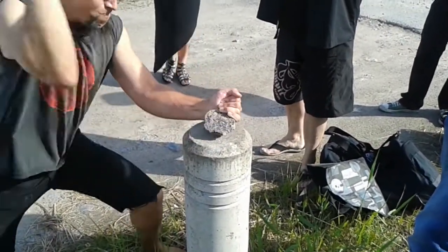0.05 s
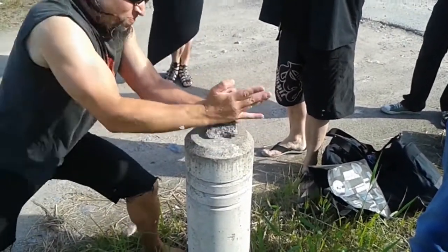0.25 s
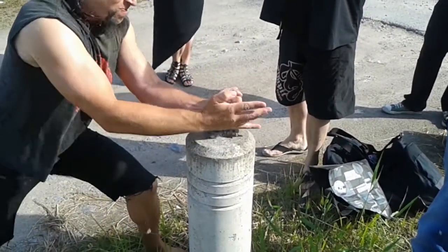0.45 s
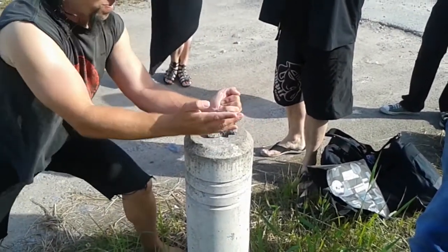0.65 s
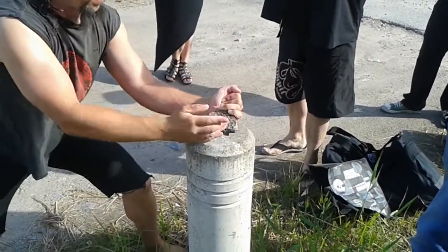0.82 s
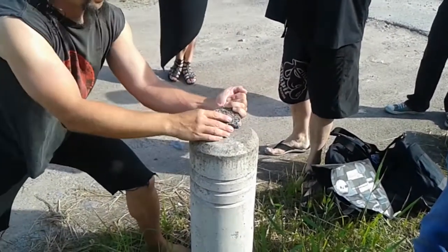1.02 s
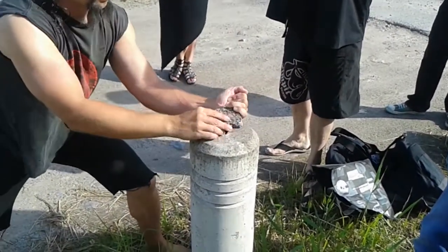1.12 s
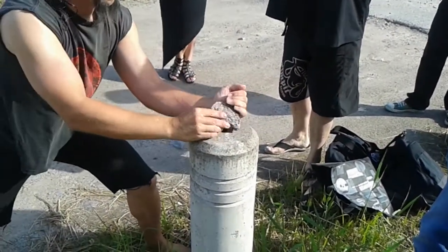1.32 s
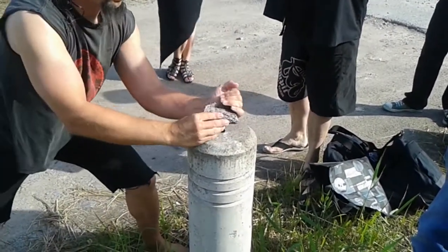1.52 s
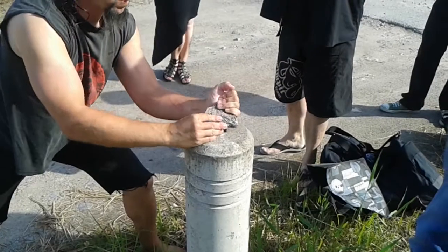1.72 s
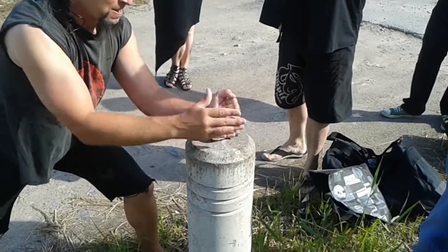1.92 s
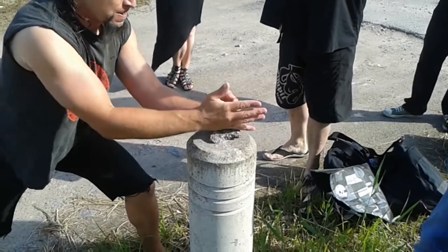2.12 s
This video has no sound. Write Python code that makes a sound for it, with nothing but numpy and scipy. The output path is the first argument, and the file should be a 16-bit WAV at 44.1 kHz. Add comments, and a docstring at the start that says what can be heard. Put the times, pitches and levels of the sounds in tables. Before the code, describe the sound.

Struck by hand on a concrete post outdoors, a stone breaks with a sharp crack. A fragment then clacks onto gritty ground and bounces briefly, with faint wind on the microphone and a low hum behind.

```python
"""Stone snapped on a post

A hand strikes a stone on a concrete post outdoors: the stone taps the post and snaps with one dry crack.
A broken piece lands with a ringing clack and tumbles to rest.
Light wind hisses and nudges the microphone over a low hum, like that of a distant engine."""
import sys
import numpy as np
from scipy import signal
from scipy.fft import rfft, irfft
from scipy.io import wavfile
from scipy.ndimage import uniform_filter1d

SR = 44100
rng = np.random.default_rng(int(sys.argv[2]) if len(sys.argv) > 2 else 0)


def int16_out(signal):
    """Quantize to a 16-bit WAV file."""
    q = np.round(np.clip(np.atleast_2d(signal).T, -1, 1) * 32767)
    wavfile.write(sys.argv[1], SR, q.astype(np.int16))


N = 94815


def amp(db):
    """Decibels to gain."""
    return 10 ** (np.asarray(db) / 20)


def unit_rms(x):
    """Scales to an rms of 1."""
    return x / np.sqrt(np.mean(x ** 2) + 1e-20)


def curve_at(points, hz):
    """Interpolates a table on a log-frequency axis."""
    point_hz, value = np.transpose(points)
    return np.interp(np.log(hz + 1), np.log(point_hz + 1), value)


def add(mix, start_s, sound):
    """Mixes a sound in at a start time."""
    part = mix[round(start_s * SR):][:len(sound)]
    part += sound[:len(part)]


def colour(x, spectrum, size=4096):
    """Minimum-phase filter with the given spectrum."""
    hz = abs(np.fft.fftfreq(size, 1 / SR))
    log_gain = np.log(amp(curve_at(spectrum, hz)))
    taps = np.fft.ifft(np.exp(np.conj(signal.hilbert(log_gain)))).real
    return signal.fftconvolve(x, taps[:size // 2])[:len(x)]


def ring(force, modes):
    """Drives decaying modes; neighbours swing in opposite directions."""
    t = np.arange(SR // 2) / SR
    response = np.zeros(len(t))
    for k, (hz, db, t60_s) in enumerate(modes):
        decay = np.exp(-np.log(1000) * t / t60_s)
        response += (-1) ** k * amp(db) * decay * np.sin(2 * np.pi * hz * t)
    return signal.fftconvolve(force, response)[:len(force)]


def contact_force(contact_s, size=4096, passes=12):
    """Stone on stone: a dying burst of tiny breaks, flat in spectrum, of energy 1."""
    fade = np.exp(-np.arange(size) / SR / contact_s)
    force = rng.standard_normal(size) * fade
    for _ in range(passes):
        spectrum = rfft(force)
        whitened = irfft(spectrum / (abs(spectrum) + 1e-12))
        force = whitened * np.minimum(1, 10 * fade)
    return force / np.linalg.norm(force)


# Wind colour. Each row: frequency in Hz, relative spectral density in dB.
BREEZE_SPECTRUM = [(15, -10), (30, -1), (58, 1), (100, -3), (150, -6.5), (280, -12.5), (450, -19.5),
                   (1000, -22.5), (1700, -27), (4000, -31), (8000, -33), (14500, -33)]
# Wind swell. Each row: time in seconds, relative level in dB.
BREEZE_SWELL = [(0, 0), (.18, 4), (.3, 0.5), (.46, 0.5), (.6, 2), (.85, 0.6), (1.08, 0), (1.18, -2.5),
                (1.37, -2), (1.48, -7.5), (1.548, -2), (1.65, -5.5), (1.92, -4), (2.1, -1), (2.15, -2)]


def breeze(base_db=-59, flicker_db=0.84, lump_db=0.91, lump_hz=504.4):
    """Light wind: soft hiss over a lumpy rumble, swelling and sinking together."""
    frames = dict(fs=SR, nperseg=1024, noverlap=768)
    hz, _, bands = signal.stft(rng.standard_normal(N), **frames)
    patches = uniform_filter1d(rng.standard_normal(bands.shape), size=10, axis=0)
    patches = unit_rms(uniform_filter1d(patches, size=10, axis=1))
    depth_db = flicker_db + lump_db / (1 + (hz[:, None] / lump_hz) ** 2)
    noise = signal.istft(bands * amp(depth_db * patches), **frames)[1][:N]
    band_gain = amp(curve_at(BREEZE_SPECTRUM, np.fft.rfftfreq(N, 1 / SR)))
    wind = unit_rms(irfft(rfft(noise) * band_gain, N))
    swell_db = np.interp(np.arange(N) / SR, *np.transpose(BREEZE_SWELL))
    return wind * amp(base_db + swell_db)


# Course of the hum. Each row: time in seconds, pitch in Hz, level in dB.
HUM_TRACK = [(0, 80.43, -52.5), (.2, 80.9, -53), (.3, 80.07, -63), (.4, 80.9, -63), (0.551, 79.66, -56),
             (.7, 80.83, -58.5), (.82, 76.93, -54), (.95, 77.8, -61.5), (1.1, 77.7, -62), (1.3, 78.5, -68),
             (1.47, 77.5, -85), (1.75, 74.7, -78), (1.95, 72.27, -78), (2.1, 73.16, -58.5), (2.15, 73, -65)]
# Its partials. Each row: multiple of the pitch, relative level in dB.
HUM_PARTIALS = [(1, -1), (2, -14), (3, -21)]


def hum(waver_depth=0.34, waver_samples=2500):
    """A low wavering drone that sags in pitch and fades in and out."""
    t = np.arange(N) / SR
    times_s, pitch_hz, level_db = np.transpose(HUM_TRACK)
    phase = 2 * np.pi * np.cumsum(np.interp(t, times_s, pitch_hz)) / SR
    drone = np.zeros(N)
    for order, db in HUM_PARTIALS:
        drift = uniform_filter1d(rng.standard_normal(N), waver_samples)
        waver = unit_rms(uniform_filter1d(drift, waver_samples // 2))
        partial = np.sin(order * phase + 2 * np.pi * rng.random())
        drone += amp(db) * (1 + waver_depth * waver) * partial
    return np.sqrt(2) * drone * amp(np.interp(t, times_s, level_db))


# Wind puffs. Each row: start in seconds, level in dB, pitch in Hz, rise time in seconds.
WIND_PUFFS = [(1.52, -47, 57.7, .011), (1.969, -48, 67.3, 0.017)]


def wind_puffs():
    """Short low swings of pressure at the microphone."""
    t = np.arange(SR // 4) / SR
    pressure = np.zeros(N)
    for start_s, db, hz, rise_s in WIND_PUFFS:
        swell = (t / rise_s * np.exp(1 - t / rise_s)) ** 2
        add(pressure, start_s, -amp(db) * swell * np.sin(2 * np.pi * hz * t))
    return pressure


# Scatter from near, far and low surfaces. Each row: frequency in Hz, T60 in seconds.
NEAR_DECAY = [(300, 0.098), (2000, 0.026), (6000, 0.017), (14000, 0.033)]
FAR_DECAY = [(300, 0.29), (2000, 0.24), (6000, 0.17), (14000, 0.2284)]
LOW_DECAY = [(300, 0.051), (2000, 0.055), (6000, 0.12), (14000, 0.08)]


def scatter(x, decays, size=128):
    """The surroundings return a diffuse tail, each band dying at its own rate."""
    hz, t, bands = signal.stft(rng.standard_normal(SR // 2), SR, nperseg=size)
    decay = np.exp(-np.log(1000) * t / curve_at(decays, hz)[:, None])
    tail = signal.istft(bands * decay, SR, nperseg=size)[1]
    return signal.fftconvolve(x, tail / np.linalg.norm(tail))[:N]


# Bounces. Each row: start in seconds, ring, click and grit gains in dB, contact time in seconds.
PIECE_BOUNCES = [(0.4951, -76, -26, -17, 0.0043), (0.4958, -43, 1.5, -42, .0003),
                 (0.5397, -63, -34, -24.5, 0.015), (0.6074, -75, -46, -37, 0.0043),
                 (0.6732, -65, -33, -33.5, 0.011)]
# Modes of the loose piece. Each row: frequency in Hz, gain in dB, T60 in seconds.
PIECE_MODES = [(1690, -14, .05), (1852, -15, .16), (2336, 0, .13), (2498, -5.5, .11), (2620, -9.5, .1),
               (2888, -6, .055), (3210, -14, .04), (3800, -12, .035), (4272, -3, .042), (4710, -10, .035),
               (5155, -11, .035), (5570, -11, .04), (6340, -9, .04), (8160, -15, .035)]
# Colours of its click and of the grit under it. Each row: frequency in Hz, gain in dB.
CLICK_SPECTRUM = [(200, -35), (900, -26.5), (1300, -34), (2000, -16.5), (2400, -0.5), (2650, -1.5),
                  (2950, -0.5), (3500, -28.5), (6000, -36), (14000, -43)]
GRIT_SPECTRUM = [(200, -21), (1000, -10), (1350, -27), (1850, 1), (3300, -5), (4400, -0.5), (6200, 0),
                 (7400, -9.5), (8500, -6), (10500, -17), (13000, -9), (14500, -11)]


def tumbling_piece():
    """The broken piece clacks on gritty ground and rings freely."""
    push, click, grit = np.zeros((3, N))
    for start_s, ring_db, click_db, grit_db, contact_s in PIECE_BOUNCES:
        force = contact_force(contact_s)
        add(push, start_s, amp(ring_db) * force)
        add(click, start_s, amp(click_db) * force)
        add(grit, start_s, amp(grit_db) * contact_force(contact_s))
    return ring(push, PIECE_MODES) + colour(click, CLICK_SPECTRUM) + colour(grit, GRIT_SPECTRUM)


# A tap, then a two-step snap. Each row: start in seconds, relative level in dB, contact time in seconds.
STONE_BLOWS = [(0.2024, -26, 0.00047), (0.2061, 0, 0.00072), (0.2066, -12, .0007)]
# Snap colour. Each row: frequency in Hz, gain in dB.
SNAP_SPECTRUM = [(100, -18.5), (290, -7), (430, -11), (560, -40), (880, -8), (1080, -5.5), (1220, -24),
                 (1480, -13.5), (1750, 0.5), (2050, -1), (2480, 4.5), (3050, -9), (4300, 2), (4600, -10),
                 (5300, 1), (6200, 3.5), (6650, -4), (7400, -4.5), (9200, -10.5), (10200, -16),
                 (11300, -27), (13300, -13.5), (14500, -17.5)]
# Modes of the stone held on the post. Each row: frequency in Hz, gain in dB, T60 in seconds.
STONE_MODES = [(290, -11, .045), (875, -11, .021), (1068, -5, .027), (1755, 1, .021), (1925, -1, .026),
               (2455, 2, .021), (2910, -11, .022), (3230, -9, .02), (3900, -8, .018), (4345, -3, .022),
               (5340, -4, .014), (6130, -2, .015), (8490, -13, .018)]


def stone_crack(snap_db=4, ring_db=-32.5, echo_s=0.0035, echo_db=-17, echo_cutoff_hz=3000):
    """The stone snaps and rings briefly under the hand; the ground returns a dull echo."""
    force, echo = np.zeros((2, N))
    for start_s, db, contact_s in STONE_BLOWS:
        add(force, start_s, amp(db) * contact_force(contact_s))
    direct = amp(snap_db) * colour(force, SNAP_SPECTRUM) + amp(ring_db) * ring(force, STONE_MODES)
    dulled = signal.lfilter(*signal.butter(1, echo_cutoff_hz, fs=SR), direct)
    add(echo, echo_s, dulled)
    return direct + amp(echo_db) * echo


def scene():
    """The crack and the tumbling piece in the open air, in mono."""
    crack, clack = stone_crack(), tumbling_piece()
    near = amp(-6) * scatter(crack, NEAR_DECAY)
    low = amp(-8.5) * scatter(clack, LOW_DECAY)  # the piece lies low: ground and post reflect it
    far = amp(-28.5) * scatter(crack + clack, FAR_DECAY)
    background = breeze() + hum() + wind_puffs()
    return (crack + clack + near + low + far + background)[None]


def record(dry, cutoff_hz=14650):
    """A steep low-pass removes the top treble."""
    taps = signal.firwin(511, cutoff_hz, window=("kaiser", 9), fs=SR)
    return signal.oaconvolve(dry, taps[None], "same")


dry = scene()
out = record(dry)
int16_out(out)
```